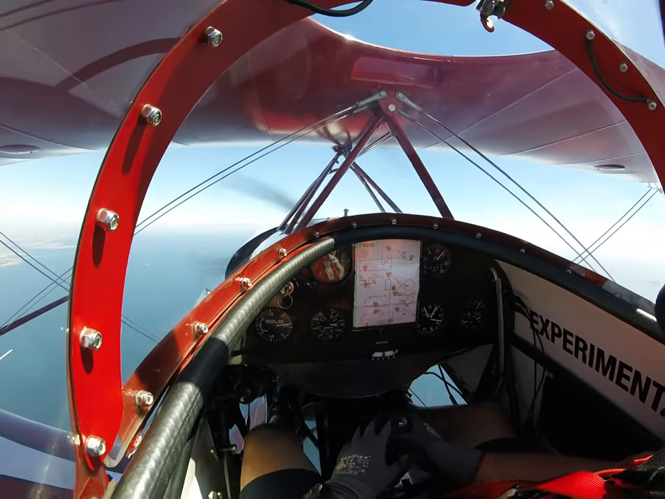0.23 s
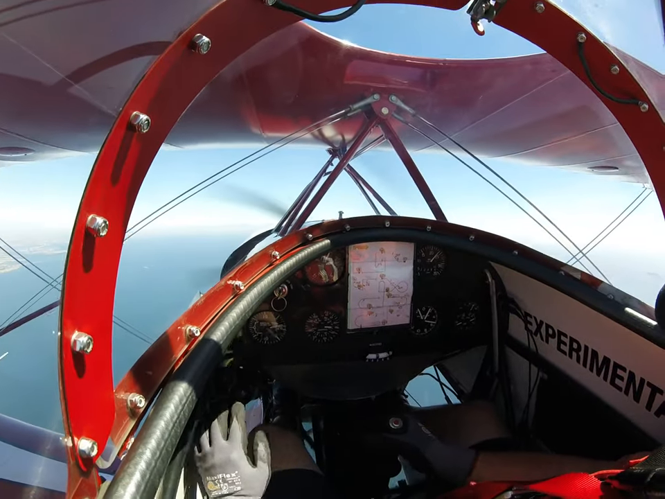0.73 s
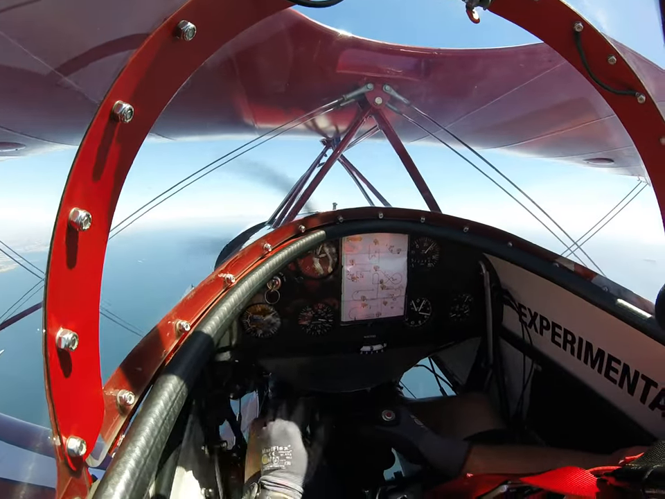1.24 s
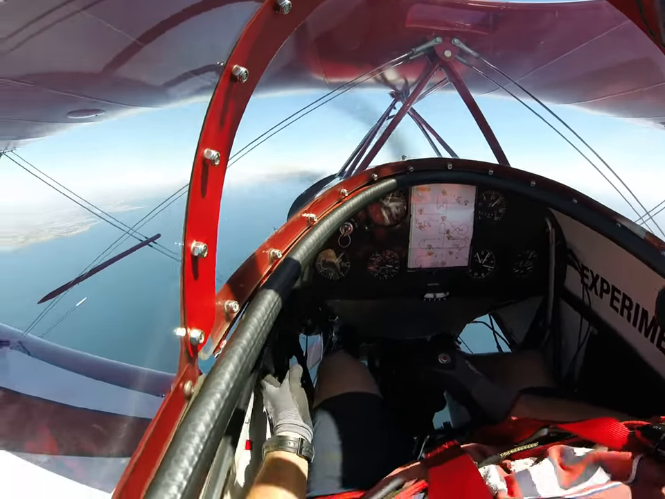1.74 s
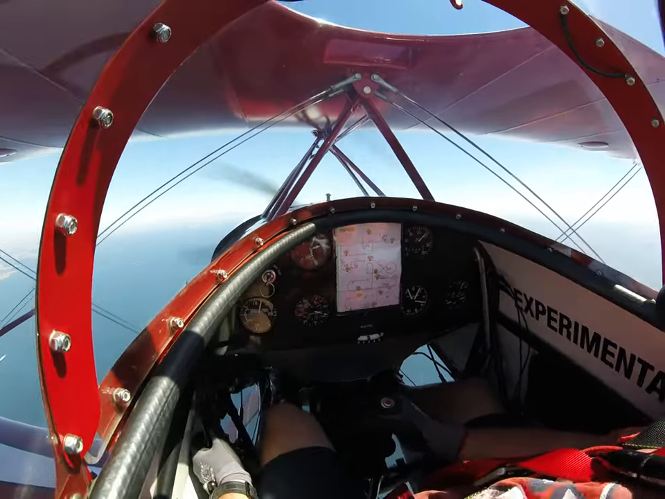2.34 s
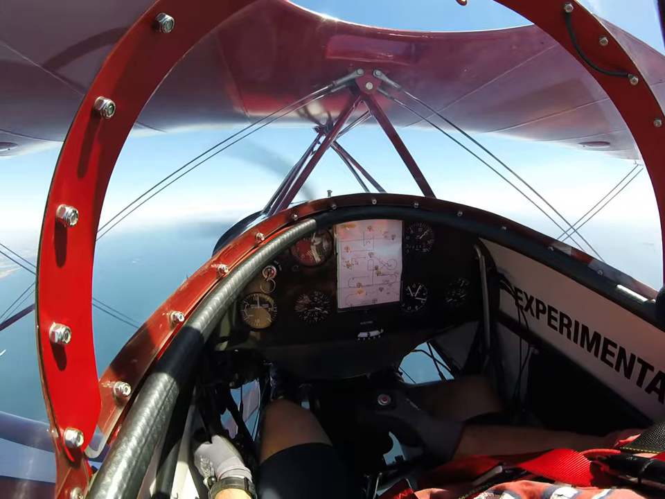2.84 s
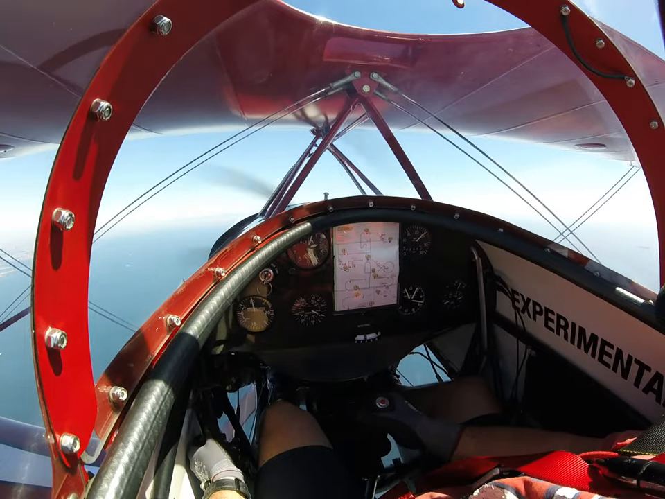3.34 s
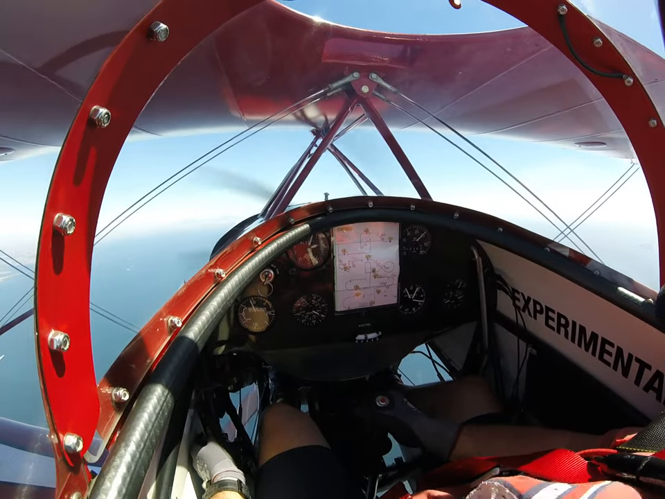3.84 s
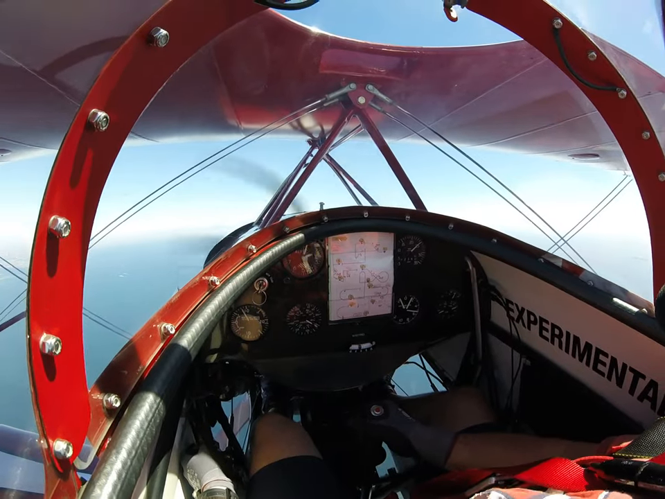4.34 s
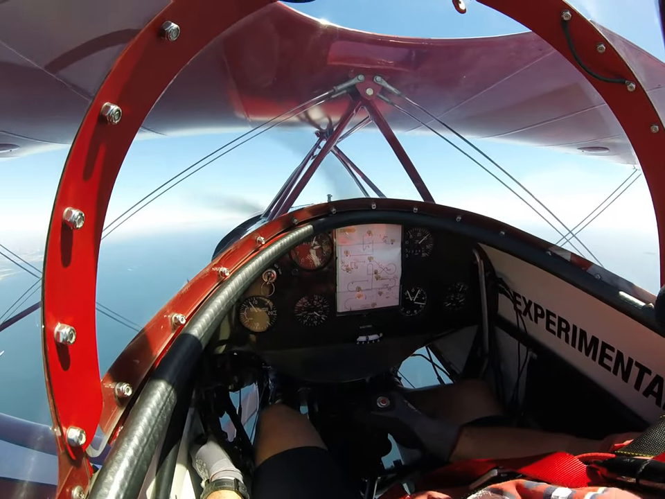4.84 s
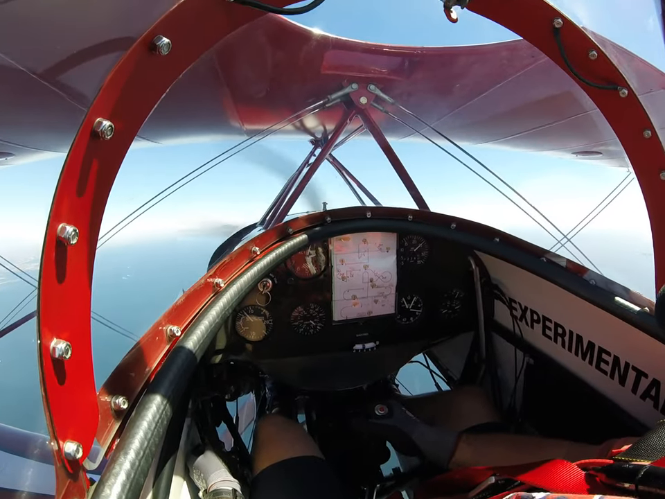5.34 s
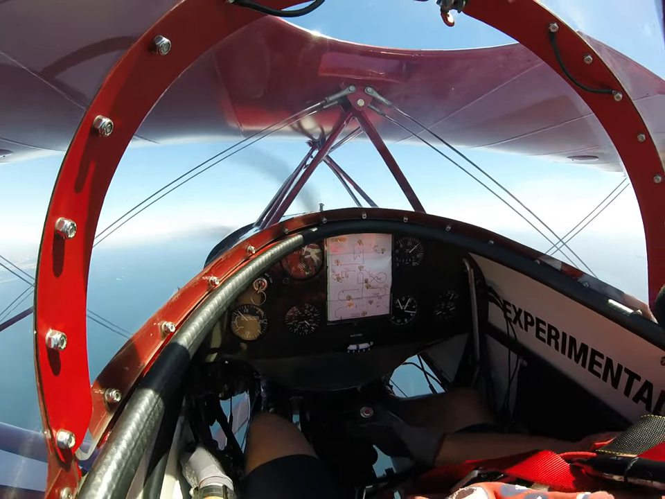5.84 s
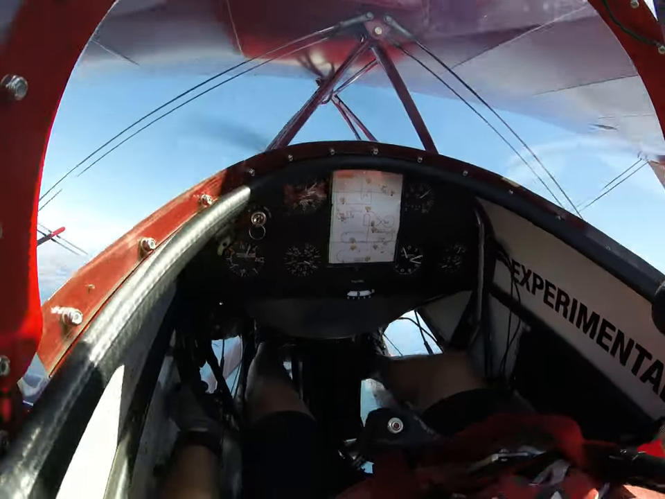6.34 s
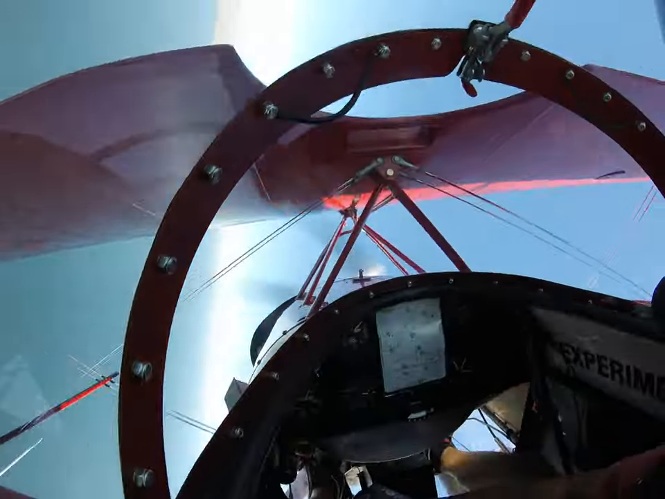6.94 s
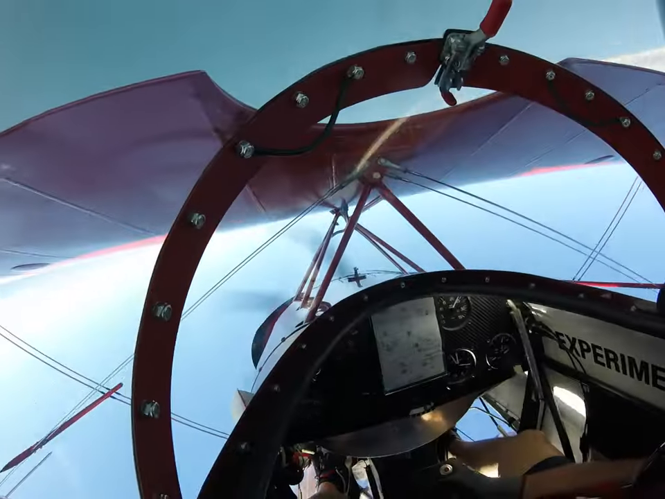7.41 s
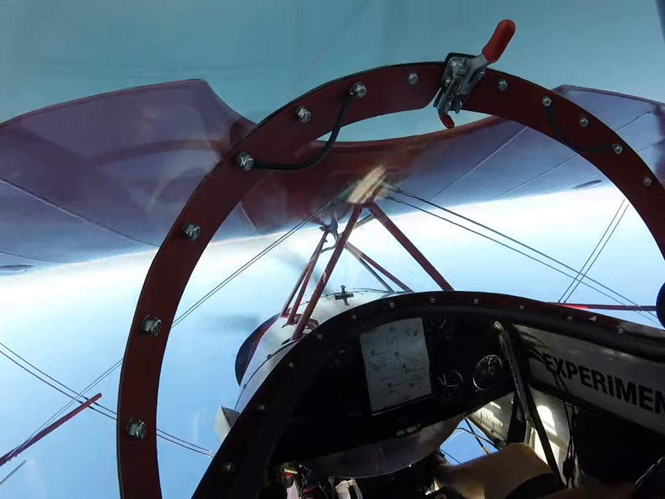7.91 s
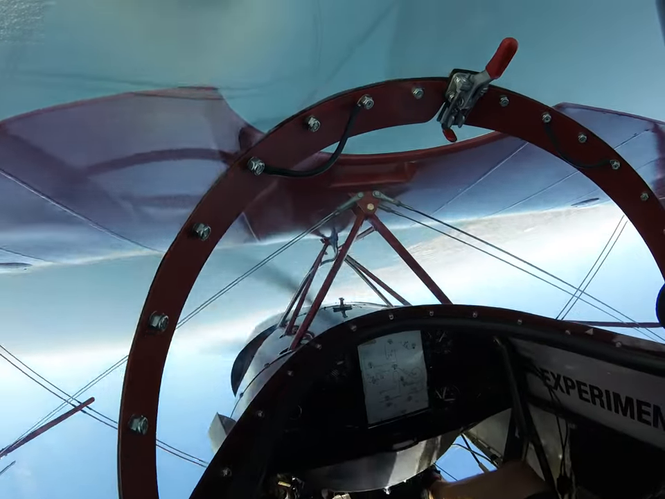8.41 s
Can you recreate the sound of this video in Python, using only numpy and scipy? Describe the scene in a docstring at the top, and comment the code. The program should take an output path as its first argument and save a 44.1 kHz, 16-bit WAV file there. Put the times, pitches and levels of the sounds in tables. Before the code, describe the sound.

Inside the closed cockpit of an aerobatic biplane, a piston engine and propeller drone with an uneven throb over the hiss of the slipstream, slowly rising in pitch. After about six seconds a sharp roll makes the airframe shudder, and air slaps the canopy with dull thuds. The revs sag and the drone thins; after a short lull a deeper rush of air sets in and the sound fills out again.

```python
"""Inside the closed cockpit of an aerobatic biplane under power. From the start, an unevenly firing
four-cylinder engine drives a three-blade propeller, their upper harmonics coloured by cabin resonances,
over the slipstream's hiss. A gentle bank brings out the growl as speed slowly builds. After six seconds
a sharp roll buffets the airframe, air slaps the canopy, the revs sag and the drone thins. A short lull
follows; then, with the aircraft on its back, a deeper rush sets in and the sound fills out again."""
import sys
import numpy as np
from scipy import signal
from scipy.fft import rfft, irfft, next_fast_len
from scipy.io import wavfile

SR = 44100
rng = np.random.default_rng(int(sys.argv[2]) if len(sys.argv) > 2 else 0)


def unload_wav(signal):
    """Save mono or channel-first audio to the path in sys.argv[1] as 16-bit WAV at rate SR, clipped to [-1, 1]."""
    wavfile.write(
        sys.argv[1],
        SR,
        np.round(np.clip(np.atleast_2d(signal).T, -1, 1) * 32767).astype(np.int16),
    )


N = 382347
TIME = np.arange(N) / SR

# loudness of the rushing noise, dipping after the roll and recovering; used about its mean: t/s, level/dB
LOUDNESS = [(0, -36), (1.1, -34.5), (3.3, -33), (5.6, -31.5), (6.08, -31.5), (6.45, -33.5), (6.8, -33),
            (7.08, -38.5), (7.55, -36.5), (8.1, -34.5), (8.67, -34)]
# brief swells in the level of the rushing noise: t/s, lift/dB
BRIEF_SWELLS = [(.35, 0.5), (1.6, 2), (3.32, 2), (3.98, 0), (4.29, 2), (5.55, 1)]
# turbulence on the airframe: t/s, level/dB
TURBULENCE = [(5.9, -48), (6.28, -35), (6.46, -23.5), (6.6, -20), (6.82, -21.5), (6.95, -24), (7.15, -50)]
# slaps of air on the canopy: t/s, rush level/dB, thud level/dB
SLAPS = [(6.275, -33, -36), (6.575, -31, -32), (6.675, -31, -38), (6.715, -34, -24), (6.77, -34, -25),
         (6.815, -31, -29), (6.845, -32, -31), (6.93, -42, -31), (6.97, -34, -38)]
# ticks of loose fittings: t/s, starting gain/dB
RATTLES = [(2.0987, -36), (2.104, -39), (6.1635, -37.5)]
# spectral densities of the noises: f/Hz, relative level/dB
RUMBLE_SPECTRUM = [(12, -20), (22, -12), (41, -6), (55, -0.5), (80, -2), (125, 2), (170, -3.5), (220, -12),
                   (300, -32.5), (500, -70.5)]
ROAR_SPECTRUM = [(120, -24), (200, -1), (280, -1.5), (420, 2), (560, -2.5), (740, -8), (1100, -14),
                 (2000, -22.5), (5000, -56.5)]
RUSH_SPECTRUM = [(200, -15), (262, 5.5), (300, -5), (360, -3), (410, -16), (510, 2), (640, -25),
                 (1200, -55)]
SLIPSTREAM_SPECTRUM = [(400, -16), (900, -1.5), (1180, -0.5), (1500, -1), (2050, -1.5), (2700, -5),
                       (3700, -4.5), (4500, -13), (6000, -19.5), (12000, -62)]
HISS_SPECTRUM = [(2500, -26.5), (4500, -4), (5300, -3.5), (6000, 0), (7000, -5), (8200, -8.5),
                 (9900, -15.5), (11100, -18), (12200, -33.5)]
SHUDDER_SPECTRUM = [(10, -12), (24, 6), (50, 1), (80, -3), (125, 5), (200, -23), (260, -11.5), (390, -7),
                    (600, -17), (1000, -33), (5000, -72)]
THUD_SPECTRUM = [(180, -18), (330, 4), (420, 2), (600, 2.5), (800, -7), (1500, -24), (4000, -60),
                 (9000, -100)]
# resonances and hollows of the air leaks round the canopy: f/Hz, width/Hz, gain/dB
LEAK_MODES = [(1010, 70, 2), (1060, 90, -4.5), (1300, 80, -4), (1470, 92, 1), (1680, 80, -2),
              (2210, 44, 0.5), (4030, 200, 4.5), (6486, 350, 6.5)]
# resonances and hollows of the cabin: f/Hz, width/Hz, gain/dB
CABIN_MODES = [(240, 30, 16), (271, 22, -5), (310, 17, 6), (328, 22, -1.5), (401, 56, 10.5), (433, 22, 3),
               (460, 29, -8.5), (492, 30, 8.5), (587, 34, 0), (600.6, 22.4, 9), (694, 30, 1),
               (752, 33, -4.5), (837, 69, 4), (928, 46, -6), (1007, 27, 8.5), (1290, 130, -3.5),
               (1355, 49, 11)]
# narrow standing waves in the cabin: f/Hz, width/Hz, gain/dB
STANDING_WAVES = [(242.2, 6, 7), (248.6, 2.6, -12), (274, 5, -9), (486.5, 13, 6.5), (508, 5, 4),
                  (568, 6, 3), (592, 7, 2.5), (616, 7, 6), (729, 11, 6.5)]
# rate of the four-stroke cycle (two crank turns); an order is a multiple of this rate: t/s, f/Hz
CYCLE_RATE = [(0, 19.89), (.25, 19.85), (1, 20.07), (2, 20.28), (3.3, 20.555), (5, 20.865), (6.25, 21.055),
              (6.4, 20.86), (6.75, 19.9), (6.87, 19.93), (7, 20.14), (7.25, 20.31), (8.2, 20.185),
              (8.67, 20.35)]
# cylinders in firing order: pulse arrival/cycles, pulse strength, puff level/dB
CYLINDERS = [(.004, 1.0, -1.2), (.243, .46, 1.0), (.509, .98, 1.3), (.722, .34, 1.6)]
# load on the blades in manoeuvres: start t/s, hold/s, lift of the blade tone/dB
BLADE_LOADS = [(-.15, 0.41, 2.5), (5.0, .8, 2.5), (6.284, 0.49, 19), (7.94, 0.21, 7)]
# upper propeller harmonics: order, level/dB relative to the propeller's buzz
PROPELLER_ORDERS = [(24, 0), (36, -9), (48, -10)]
# spectral envelope of the exhaust harmonics: f/Hz, relative level/dB
EXHAUST_SPECTRUM = [(200, -21), (400, -20.5), (540, -23), (700, -20), (1100, -30.5), (1900, -31.5),
                    (3000, -38)]
# exhaust harmonics favoured or weakened by uneven firing: order, gain/dB
FAVOURED_ORDERS = [(13, 1), (14, 2), (16, -4), (17, 2.5), (19, 2.5), (20, -2.5), (22, 0), (29, 1.5),
                   (30, -2.5), (33, 1.5), (34, -1.5), (35, -2.5), (38, -10), (40, -2.5), (42, -4), (65, 3),
                   (66, -2.5), (72, -5)]
# rows for the firing tone, blade tone, second firing harmonic and uneven beat:
# level/dB at cruise, slope with cycle rate/(dB/Hz), loss in the roll/dB, share of the blade load
DRONE_TONES = [(-18.0, 1.5, 8.5, 0.043), (-22, 4, 12, 1), (-20, -3.5, 4.5, 0.052), (-26.5, 0.6, 4.5, 0.1)]
# harmonics of the uneven beat: order, relative level/dB, slope/(dB/Hz), loss in buffeting/dB
UNEVEN_ORDERS = [(2, -13, -2, -1), (3, -17, -1, -3), (5, -7, 4, 5), (7, -5, 4, 4), (9, 1, -2, 10),
                 (10, -20.5, 6, 0), (11, -14, 13, 4)]

CRUISE_HZ = 20.4   # reference cycle rate
ROLL_S, INVERTED_S, TURNOVER_S = 6.28, 6.98, 0.42
LULL_S, LULL_ATTACK_S, LULL_HOLD_S = 6.89, 0.12, 0.1


def from_db(db):
    """Amplitude ratio: tenfold for every 20 dB."""
    return 10 ** (np.asarray(db) / 20)


def unit_power(x):
    """Normalisation by the root mean square."""
    return x / np.sqrt(np.mean(x ** 2) + 1e-20)


def in_time(curve):
    """Linear interpolation of a curve at every sample."""
    return np.interp(TIME, *np.transpose(curve))


def spectrum_db(points, hz):
    """Spectral envelope, interpolated over logarithmic frequency."""
    f, db = np.transpose(points)
    return np.interp(np.log(hz + 1e-6), np.log(f), db)


def resonance_db(modes, hz):
    """Resonance: each mode adds a Lorentzian peak or hollow to the level."""
    return sum(db / (1 + (2 * (hz - f) / width) ** 2) for f, width, db in modes)


def drift(rate_hz, hop=200):
    """Slow random modulation: low-passed noise of about unit power."""
    pole, steps = np.exp(-2 * np.pi * rate_hz * hop / SR), N // hop + 2
    slow = signal.lfilter([1], [1, -2 * pole, pole * pole], rng.standard_normal(2 * steps))[steps:]
    return np.interp(np.arange(N), np.arange(steps) * hop, unit_power(slow))


def noise(spectrum, modes=(), share=1):
    """Source and filter: white noise shaped by a spectrum and resonances, at unit power."""
    size = next_fast_len(N, real=True)
    hz = np.arange(size // 2 + 1) * SR / size
    gain = from_db(spectrum_db(spectrum, hz) + share * resonance_db(modes, hz))
    return unit_power(irfft(rfft(rng.standard_normal(size)) * gain, size)[:N])


def swell(start_s, attack_s, hold_s, release_s):
    """Trapezoidal envelope from 0 to 1 and back."""
    return np.interp(TIME, start_s + np.cumsum([0, attack_s, hold_s, release_s]), [0, 1, 1, 0])


def bump(centre_s, width_s):
    """Gaussian envelope of unit height."""
    return np.exp(-np.minimum(((TIME - centre_s) / width_s) ** 2, 20))


def banking():
    """Envelope of the gentle bank: 0 in level flight, 1 at its height."""
    return swell(1.57, attack_s=0.2, hold_s=0.25, release_s=1.0)


def inverted():
    """Ramp of attitude: 0 upright, 1 with the aircraft on its back."""
    return np.clip((TIME - INVERTED_S) / TURNOVER_S, 0, 1)


def blade_load_db():
    """Aerodynamic loading: manoeuvres work the blades harder and lift their tone."""
    return sum(db * swell(s, 0.18, hold_s, 0.37) for s, hold_s, db in BLADE_LOADS)


def puffs_db(cycle, lag_cycles, depth_db, uneven):
    """Amplitude modulation: each firing blows a puff of noise, some cylinders harder than others."""
    blow_db = np.array(CYLINDERS)[:, -1]
    count = len(blow_db)
    firing = (cycle - lag_cycles) * count
    own_db = np.interp(firing % count, np.arange(count + 1), np.append(blow_db, blow_db[0]))
    return depth_db * np.cos(2 * np.pi * firing) + uneven * (own_db - blow_db.mean())


def rumble(loudness_db):
    """Low-frequency noise, its level following the loudness curve."""
    return from_db(-26 + 0.96 * loudness_db) * noise(RUMBLE_SPECTRUM)


def fuselage_rush(loudness_db):
    """Flow noise along the fuselage in inverted flight, following the loudness curve steeply."""
    return inverted() * from_db(-31.3 + 2.1 * loudness_db) * noise(RUSH_SPECTRUM)


def slipstream(cycle, loudness_db, stir):
    """Turbulent flow noise, filtered by the resonances of the canopy's leaks and pulsed by the firing."""
    flutter = drift(8.2)
    swells_db = sum(db * bump(s, width_s=0.051) for s, db in BRIEF_SWELLS)
    rush_db = -36 + 0.95 * loudness_db - stir + swells_db + 0.5 * flutter
    rush_db += puffs_db(cycle, lag_cycles=0.03, depth_db=1.0, uneven=0.3) * (1 + stir)
    rush = from_db(rush_db) * noise(SLIPSTREAM_SPECTRUM, LEAK_MODES)
    hiss_db = -45 + 0.98 * loudness_db - 0.88 * stir + 0.72 * flutter
    hiss_db += puffs_db(cycle, lag_cycles=0.027, depth_db=1.0, uneven=0.9)
    hiss = from_db(hiss_db) * noise(HISS_SPECTRUM, LEAK_MODES)
    treble = signal.sosfiltfilt(signal.butter(2, 7600, "high", fs=SR, output="sos"), hiss)
    return rush + hiss - 0.64 * np.sqrt(stir) * treble   # the hiss dulls as the roll breaks up the flow


def rattles(decay_s, low_hz):
    """Damped impacts: loose fittings give bright ticks of noise that decay exponentially."""
    envelope = sum(from_db(db) * (TIME >= s) * np.exp(-np.minimum(np.abs(TIME - s) / decay_s, 20))
                   for s, db in RATTLES)
    band = signal.butter(1, [low_hz, 9000], "band", fs=SR, output="sos")
    return envelope * signal.sosfilt(band, rng.standard_normal(N))


def buffeting(turbulence_db):
    """Forced vibration: lumps of turbulent air make the airframe shudder."""
    level_db = turbulence_db + 0.5 + 1.2 * drift(10.0)
    return from_db(level_db) * noise(SHUDDER_SPECTRUM, CABIN_MODES, share=0.2)


def canopy_slaps(rush_width_s, thud_width_s):
    """Pressure transients: each short rush of air drives a dull thud from the canopy."""
    rush = sum(from_db(db) * bump(s, rush_width_s) for s, db, _ in SLAPS)
    thud = sum(from_db(db) * bump(s, thud_width_s) for s, _, db in SLAPS)
    return (rush * noise(SLIPSTREAM_SPECTRUM, CABIN_MODES)
            + thud * noise(THUD_SPECTRUM, CABIN_MODES, share=0.61))


def roar(cycle, lift_db, stir):
    """Broadband noise of engine and blades, modulated at the firing rate and coloured by the cabin."""
    level_db = -30.5 + lift_db - 0.91 * stir
    level_db += puffs_db(cycle, lag_cycles=-0.1, depth_db=1.5, uneven=-0.13)
    return from_db(level_db) * noise(ROAR_SPECTRUM, CABIN_MODES, share=0.26)


def propeller(cycle, cycle_hz, stir, lull):
    """Harmonics of the blades' periodic pressure dips, swept through the cabin's standing waves."""
    phase = 2 * np.pi * (cycle + 0.011)   # a blade passes just ahead of the exhaust pulse
    load_db = blade_load_db()
    settling = swell(7.24, 0.16, 0, 0.32)   # the hum dips as the aircraft settles on its back
    hum_db = -36.5 + 2 * inverted() + 5.5 * np.tanh(load_db / 7.5) ** 2 + 2.5 * banking() - 9 * settling
    overtone_db = -48.5 + 8.5 * np.tanh(load_db / 3)
    buzz_db = -41.5 - 11 * lull
    harmonics = [(12, hum_db), (18, overtone_db)]
    harmonics += [(round(order), buzz_db + db) for order, db in PROPELLER_ORDERS]
    tones = np.zeros(N)
    for order, db in harmonics:
        level_db = db + resonance_db(STANDING_WAVES, order * cycle_hz) + 1.1 * drift(0.57)
        tones += from_db(level_db) * np.cos(order * phase)
    return -np.sqrt(2) * from_db(-19 * stir) * tones


def exhaust_buzz(cycle, cycle_hz, lift_db, stir, lull, waver_db, scatter_db):
    """Resonant filtering: upper exhaust harmonics swell and fade as the revs carry them across modes."""
    rates_hz = np.linspace(cycle_hz.min(), cycle_hz.max(), 20)
    favoured_db = {round(order): db for order, db in FAVOURED_ORDERS}
    tones = np.zeros(N)
    for order in np.setdiff1d(np.arange(13, 150), [18, 24, 36, 48]):   # skip the propeller's orders
        # higher up, the cabin's modes crowd together and favour harmonics at random
        chance_db = scatter_db * rng.uniform(-1, 1) * np.clip((order - 30) / 40, 0, 1)
        hz = order * rates_hz
        level_db = spectrum_db(EXHAUST_SPECTRUM, hz) + resonance_db(CABIN_MODES + STANDING_WAVES, hz)
        level_db += favoured_db.get(order, chance_db)
        gain = np.interp(cycle_hz, rates_hz, from_db(level_db)) * from_db(waver_db * drift(1.0))
        tones += gain * np.cos(2 * np.pi * (order * cycle + rng.random()))
    manoeuvre_db = 2 * banking() - 5 * stir - 3 * lull - 0.5 * inverted()
    return np.sqrt(2) * from_db(-29.5 + lift_db + manoeuvre_db) * tones


def firing_harmonic(cycle, order):
    """Fourier component at unit power; the four pulses' unequal strengths and spacing set its phase."""
    arrival, strength, _ = np.transpose(CYLINDERS)
    phase = np.angle(np.sum(strength * np.exp(-2j * np.pi * order * arrival)))
    return -np.sqrt(2) * np.cos(2 * np.pi * order * cycle + phase)


def engine_drone(cycle, cycle_hz, stir):
    """Superposition: low exhaust harmonics and the blade tone add to a throb at the cycle rate."""
    excess_hz = cycle_hz - CRUISE_HZ
    thinning = swell(ROLL_S, attack_s=0.25, hold_s=0, release_s=3)
    firing_db, blade_db, second_db, uneven_db = [
        db + slope * excess_hz - loss_db * thinning + share * blade_load_db() + 0.05 * drift(3.3)
        for db, slope, loss_db, share in DRONE_TONES]
    # the blade tone comes later at higher revs and earlier when inverted, which reshapes the throb
    blade_lag_cycles = 0.04 * (cycle_hz - 20.58) - 0.038 * inverted()
    tones = from_db(firing_db) * firing_harmonic(cycle, order=4)
    tones += from_db(blade_db) * firing_harmonic(cycle - blade_lag_cycles, order=6)
    tones += from_db(second_db - 2.7 * stir) * firing_harmonic(cycle, order=8)
    for order, db, slope, loss_db in UNEVEN_ORDERS:
        level_db = uneven_db + db + slope * excess_hz - loss_db * stir
        tones += from_db(level_db) * firing_harmonic(cycle, round(order))
    return tones


def scene():
    """Sound pressures add: engine, propeller and air, tied to the turning crank and a loudness curve."""
    cycle_hz = in_time(CYCLE_RATE)
    cycle = np.cumsum(cycle_hz) / SR - 0.295   # phase, counted in engine cycles
    cycle += 0.0011 * drift(2.0)   # the engine hunts
    cycle += 0.0003 * drift(8.8)   # no two firings are quite alike
    loudness_db = in_time(LOUDNESS)
    loudness_db -= loudness_db.mean()
    turbulence_db = in_time(TURBULENCE)
    stir = from_db(turbulence_db - turbulence_db.max())   # near 0 in smooth air, 1 at the roll's height
    lull = swell(LULL_S, LULL_ATTACK_S, LULL_HOLD_S, release_s=0.21)
    long_lull = swell(LULL_S, LULL_ATTACK_S, LULL_HOLD_S, release_s=0.52)
    lift_db = 0.71 * loudness_db - 2.5 * long_lull + 1.2 * np.tanh(blade_load_db() / 12)
    mix = engine_drone(cycle, cycle_hz, stir) + propeller(cycle, cycle_hz, stir, lull)
    mix += exhaust_buzz(cycle, cycle_hz, lift_db, stir, lull, waver_db=2.0, scatter_db=5.5)
    mix += rumble(loudness_db) + roar(cycle, lift_db, stir)
    mix += fuselage_rush(loudness_db) + slipstream(cycle, loudness_db, stir)
    mix += buffeting(turbulence_db) + canopy_slaps(rush_width_s=0.0058, thud_width_s=0.011)
    mix += rattles(decay_s=0.0014, low_hz=3000)
    return mix[None]


def record(dry):
    """Soft saturation rounds the loudest peaks; a low-pass filter cuts the top."""
    ceiling, stopband_hz = 0.63, 14364
    rounded = dry / (1 + (dry / ceiling) ** 8) ** (1 / 8)
    return signal.sosfilt(signal.cheby2(12, 70, stopband_hz, fs=SR, output="sos"), rounded)


dry = scene()
out = record(dry)
unload_wav(out)
```